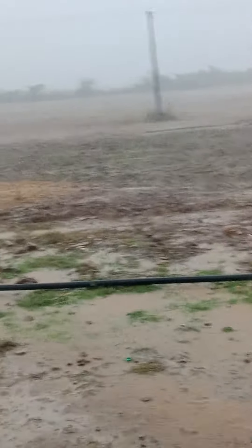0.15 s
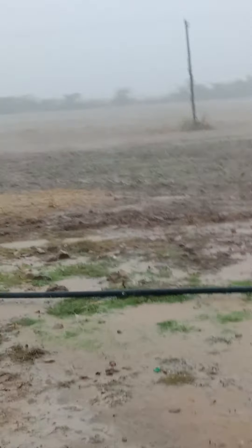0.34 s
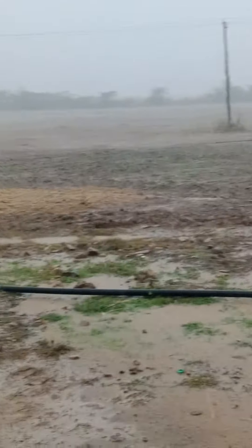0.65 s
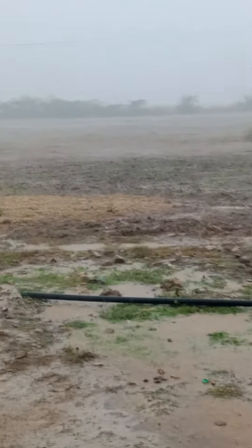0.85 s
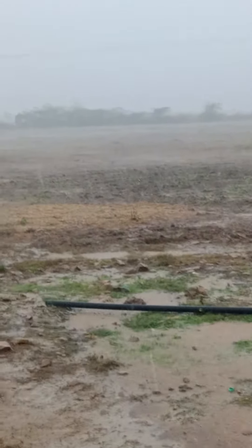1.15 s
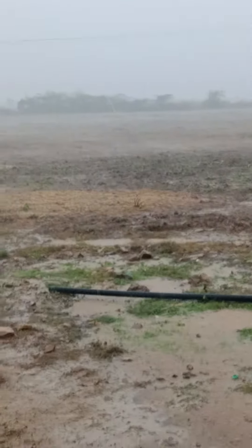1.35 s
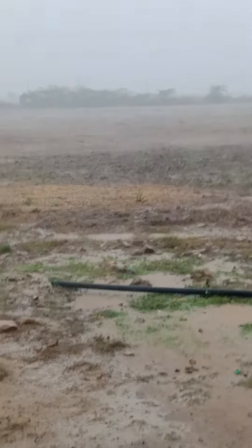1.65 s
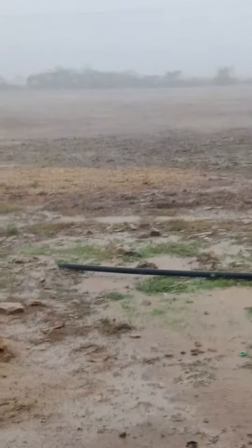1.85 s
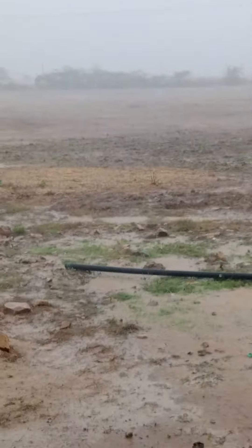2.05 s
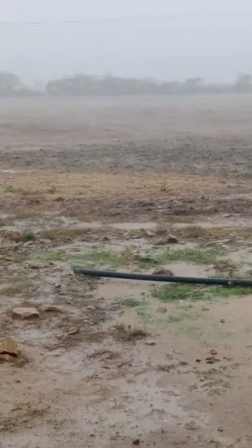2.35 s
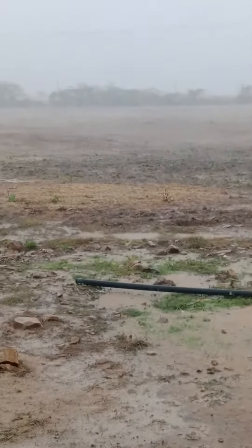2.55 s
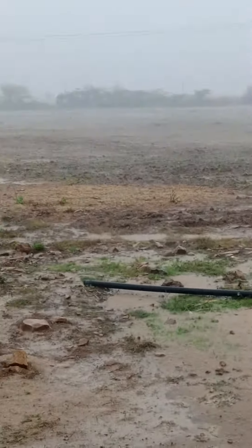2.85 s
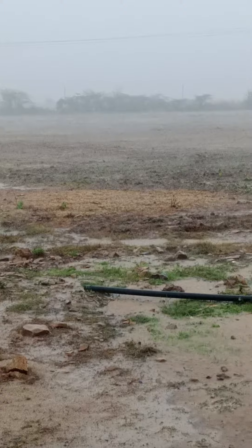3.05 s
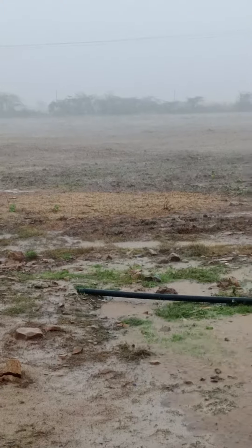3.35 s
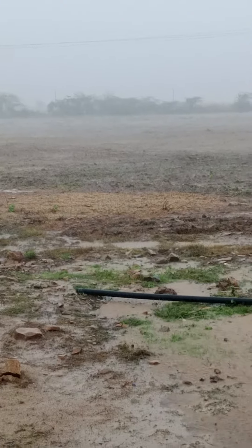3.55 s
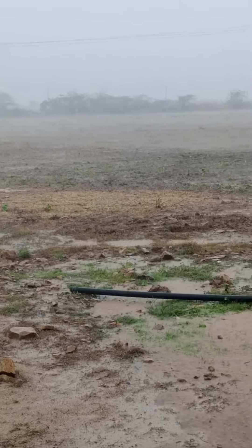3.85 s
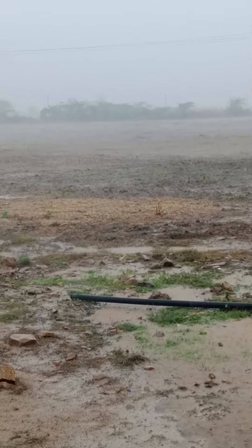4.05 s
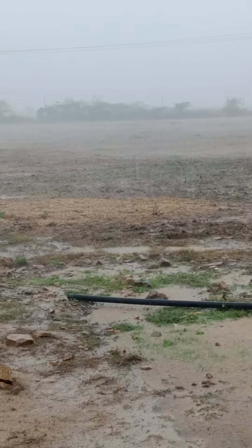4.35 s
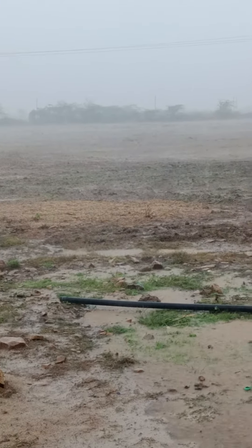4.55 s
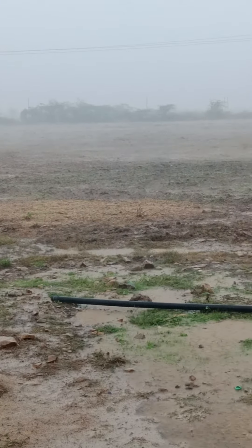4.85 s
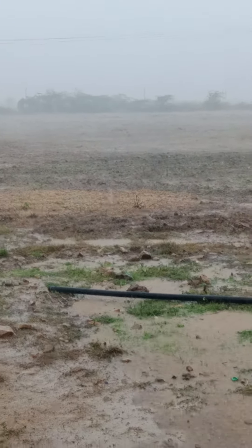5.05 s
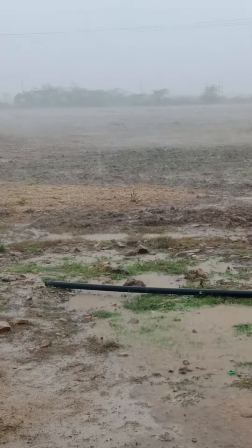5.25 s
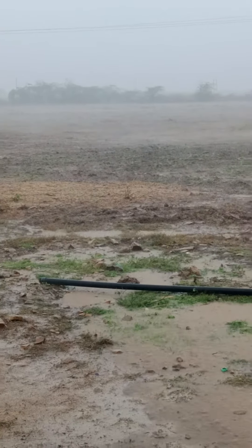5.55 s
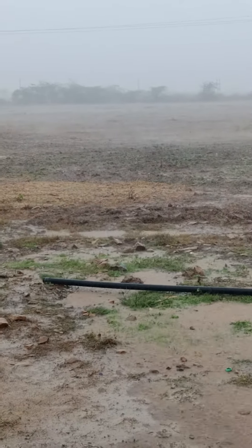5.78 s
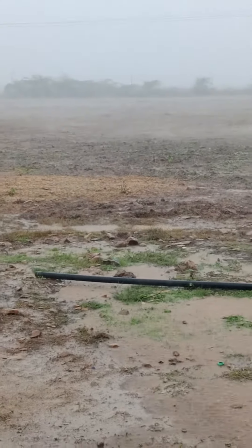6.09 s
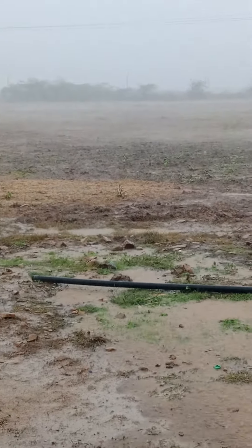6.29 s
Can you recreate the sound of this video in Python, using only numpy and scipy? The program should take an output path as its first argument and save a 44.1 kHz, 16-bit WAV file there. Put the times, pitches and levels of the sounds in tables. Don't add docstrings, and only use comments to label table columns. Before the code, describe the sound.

Heavy rain falls throughout on an open muddy field, heard close through a hand-held phone with no wind protection. The rain is a dense, bright, very high hiss, with a weaker, patchy lower patter underneath. Sharp tiny cracks and splashes of near drops dot it at random, plus occasional dull plastic ticks on the phone case. A violent low wind thump opens the first 0.1 seconds, and another rough, popping group hits around 0.6-0.8. From 1.3 to 2.5 softer rumbling bursts come and go, with a firmer one near 2.25, as the rain swells slightly. From about 2.8 to 5.1 the wind mostly drops, leaving hiss and drops, except a short low thud near 3.6; the rain thins around 4. Between 5.15 and 5.75 several fluttering gusts return while the rain strengthens again, then wind fades and rain continues to the end at about 6.4.

```python
import sys
import numpy as np
from scipy import signal
from scipy.fft import rfft, irfft, next_fast_len
from scipy.io import wavfile
from scipy.ndimage import uniform_filter1d, map_coordinates

SR = 44100
rng = np.random.default_rng(int(sys.argv[2]) if len(sys.argv) > 2 else 0)


def gain_from_decibels(decibels):
    exponent = np.asarray(decibels, float) / 20
    return 10 ** exponent


def wav_out(sig):
    wavfile.write(sys.argv[1], SR, np.round(np.clip(np.atleast_2d(sig).T, -1, 1) * 32767).astype(np.int16))


N = 283122

# time in seconds, level in dB.
DOWNPOUR = [(0.0, -43), (0.29, -41), (1.14, -42.5), (1.48, -39), (1.86, -40), (2.48, -36.5), (2.75, -38.5),
            (3.31, -39), (3.93, -42.5), (4.61, -40.5), (5.4, -37), (5.65, -36.5), (6.42, -40)]
# frequency in Hz, level in dB.
HISS_COLOUR = [(4000, -50), (4850, -42), (5700, -31), (6600, -5.5), (7700, -2), (8800, -4.5), (9400, -7.5),
               (10000, 0.5), (10900, -1), (11600, -3.5), (13000, 2), (14000, -8), (15000, 0.5),
               (16500, -12)]
# frequency in Hz, level in dB.
PATTER_COLOUR = [(30, -26), (90, -6.5), (200, -10), (600, -17), (850, -11), (1200, -3), (1700, -11),
                 (2100, -7.5), (2700, -4), (3100, -14.5), (3500, -28), (4400, -31.5), (4800, -64),
                 (5500, -92)]
# frequency in Hz, level in dB.
EDGE_COLOUR = [(4700, -69.5), (5000, -43.5), (5400, -25), (6300, -18.5), (6900, -24.5), (7600, -44)]
# start in seconds, peak level in dB, pitch in Hz.
NEAR_DROPS = [(0.19, -24, 9970), (0.3303, -28, 10300), (0.4, -18.5, 13000), (0.4798, -19, 10600),
              (0.5793, -26, 13100), (0.637, -23.5, 10000), (0.9112, -28, 11100), (1.0261, -22.5, 11000),
              (1.2864, -29, 9890), (1.9983, -18, 9970), (2.292, -24, 12900), (2.4647, -34, 9890),
              (2.5146, -28, 9980), (2.6138, -20, 10600), (2.6802, -20, 12800), (2.9034, -20, 12800),
              (3.1626, -24, 10700), (3.272, -22, 10300), (3.3585, -24, 10400), (3.5003, -25, 13000),
              (3.7647, -24, 7400), (3.897, -22.5, 7100), (4.15, -22, 10900), (4.2477, -28, 9920),
              (4.4443, -23.5, 12900), (4.9446, -22, 12500), (5.2449, -27, 12900), (5.5916, -16.5, 7550),
              (5.9174, -24, 12100), (6.3333, -18, 13000)]
# start in seconds, peak level in dB.
CASE_TAPS = [(0.0596, -30), (0.263, -33.5), (0.61, -37), (0.9842, -45), (1.569, -43), (2.2215, -37.5),
             (2.5137, -38), (3.11, -40), (3.355, -38), (5.76, -39), (5.8433, -33), (6.323, -47)]
# frequency in Hz, level in dB.
CASE_COLOUR = [(900, -42.5), (1800, -7), (2900, 0.0), (3400, -11.5), (4300, -22.5), (4800, -52)]
# start in seconds, hold in seconds, buffet level in dB, sharpness in dB.
GUSTS = [(.004, 0.016, -10, -7.5), (0.039, .022, -20.5, -11), (0.103, .044, -44.5, -43),
         (0.215, .014, -31.5, -13), (0.344, 0.0087, -38.5, -37), (0.599, 0.027, -16, -4.5),
         (0.661, 0.034, -21.5, -5), (0.711, 0.042, -22.5, -5.5), (1.317, 0.012, -34, -19),
         (1.368, 0.035, -29.5, -21), (1.438, 0.039, -32.5, -17.5), (1.603, 0.024, -31.5, -25),
         (1.744, .029, -34, -17), (1.839, .003, -34.5, -14), (1.934, 0.059, -31.5, -17),
         (2.024, 0.021, -27.5, -12.5), (2.085, .01, -35, -13), (2.248, 0.049, -25, -7),
         (2.336, 0.028, -28, -16.5), (2.426, 0.037, -31, -11.5), (2.769, 0.039, -39.5, -52),
         (3.588, .025, -27, -17), (5.16, 0.026, -25, -8.5), (5.281, 0.0073, -24.5, -14),
         (5.337, 0.099, -34, -10), (5.453, 0.057, -34.5, -11), (5.534, 0.067, -23, -7.5),
         (5.642, 0.085, -34.5, -24), (5.763, 0.087, -45.5, -30)]
# start in seconds, buffet level in dB, sharpness in dB.
PUFFS = [(.279, -41.5, -17), (.431, -56, -14), (.505, -53, -24), (.845, -41.5, -28), (.9, -52, -21),
         (1.226, -49, -16.5), (1.537, -47.5, -21), (1.681, -41.5, -18), (1.898, -38, -28),
         (2.155, -35.5, -33), (2.5, -32.5, -25), (2.56, -41.5, -32), (2.621, -35.5, -35), (2.702, -55, -21),
         (2.869, -53, -16), (2.939, -40.5, -23), (3.013, -50.5, -3), (3.074, -50.5, -2), (3.3, -37.5, -39),
         (3.748, -50.5, -21), (3.817, -51, -15), (3.89, -50, -19), (4.077, -43, -12), (4.171, -53, -15),
         (4.446, -47.5, -22), (4.842, -54, -7), (4.899, -36.5, -13), (6.218, -47.5, -26), (6.395, -62, -12)]
# end of the lull in seconds, change of level
# in dB.
LULLS = [
    (0.041, -17.5),
    (0.107, -11.5),
    (.569, -15),
    (0.656, -3.5),
    (0.809, -11.5),
    (1.599, -20.5),
    (2.226, -6),
    (3.576, -20),
    (5.146, -8),
    (5.915, -16),
]
# frequency in Hz, level in dB.
PORT_COLOUR = [(15, -53), (25, -12), (50, 6), (80, 8.5), (130, 5.5), (200, -1.5), (4000, -19.5),
               (6000, -54.5)]
# start in seconds, peak level in dB,
# level of the bright top in dB, time to fall 60 dB in seconds.
SLAPS = [(0.006, 2.5, -26.5, 0.025), (0.04, -26, -14, 0.034), (0.059, -36, -4, 0.047),
         (0.21, -37.5, -8, 0.069), (0.575, -20.5, -14, 0.05), (0.61, -6.5, -4, 0.034),
         (0.654, -17, -28, 0.032), (0.677, -11, -35, 0.044), (0.737, -8.5, -8.5, 0.014),
         (1.371, -36.5, -10, 0.016), (1.599, -59, -6, 0.025), (2.245, -41, 2, 0.083),
         (2.429, -27, -18, 0.033), (3.579, -44.5, -12, 0.025), (5.173, -31, -13, 0.04),
         (5.275, -41, -15, 0.03), (5.56, -27.5, -2.5, 0.15)]
# frequency in Hz, level in dB.
SLAP_BODY = [(30, -56), (80, -2.5), (200, 27.5), (500, 13), (900, -38), (1500, -55)]
SLAP_TOP = [(200, -43), (500, 15), (900, 21), (1400, 9.5), (2500, -12), (3500, -45)]
# frequency in Hz, level in dB.
MIC_BAND = [(15, -30), (40, -8), (70, 0), (15650, 0), (15760, -90)]

PATTER_DB, PATTER_FOLLOWS = -52, 0.66
TICK_SHARE = 0.23
STRAY_COUNT, STRAY_DB, STRAY_SPREAD_DB = 50, -26.5, 3
STRAY_LOW_HZ, STRAY_HIGH_HZ = 9800, 13000
PUFF_HOLD_S, RISE_DB_PER_S, FALL_DB_PER_S = .012, 633, 374
CALM_DB, CALM_SHARP_DB = -77, -12
DULLING = 0.34
KNEE_HZ = 190


def unit(x):
    return x / np.sqrt(np.mean(x ** 2) + 1e-20)


def along(points, hz):
    f, v = np.transpose(points)
    return np.interp(np.log(hz + 1), np.log(f + 1), v)


def curves(rows):
    s, *cols = np.transpose(rows)
    return [np.interp(np.arange(N) / SR, s, c) for c in cols]


def wobble(rate):
    return map_coordinates(rng.standard_normal(N // 200), [np.arange(N) * rate / SR])


def coloured(x, spectrum):
    m = next_fast_len(N + 8192)
    gain = gain_from_decibels(along(spectrum, np.fft.rfftfreq(m, 1 / SR)))
    return irfft(rfft(x, m) * gain, m)[..., :N]


def add_at(track, s, sound):
    track[round(s * SR):][:len(sound)] += sound


def patched(x, depth_db, bins, frames):
    z = signal.stft(x, nperseg=512)[2]
    knots = rng.standard_normal(z.shape)
    grid = np.meshgrid(np.arange(z.shape[0]) / bins, np.arange(z.shape[1]) / frames, indexing="ij")
    gain = gain_from_decibels(depth_db * map_coordinates(knots, grid, order=1))
    return signal.istft(z * gain, nperseg=512)[1][:N]


def suppressed(x, strength, floor_db):
    z = signal.stft(x, nperseg=1024, noverlap=768)[2]
    power = uniform_filter1d(abs(z) ** 2, size=8, axis=1)
    power = abs(uniform_filter1d(power, size=2, axis=0))
    gain = np.maximum(1 - strength * power.mean() / (power + 1e-20), gain_from_decibels(floor_db))
    return signal.istft(z * gain, nperseg=1024, noverlap=768)[1][:N]


def impacts(count, spread_db):
    draw = rng.random((count, 3))
    size = gain_from_decibels(-spread_db * np.log(draw[:, 1] + 0.0014)) * np.sign(draw[:, 2] - .5)
    return unit(np.bincount((draw[:, 0] * N).astype(int), size, N))


def rain():
    hiss_db, = curves(DOWNPOUR)
    patter_db = PATTER_DB + PATTER_FOLLOWS * (hiss_db - hiss_db.mean())
    far = np.sqrt(1 - TICK_SHARE) * rng.standard_normal(N)
    swarm = far + np.sqrt(TICK_SHARE) * impacts(count=9000, spread_db=3.5)

    thinned = suppressed(patched(swarm, depth_db=1.5, bins=2.443, frames=8), strength=0.46, floor_db=-11.5)
    hiss = coloured(patched(swarm, depth_db=0.55, bins=13.8, frames=3.3), HISS_COLOUR)
    hiss = unit(hiss + gain_from_decibels(3.7 * wobble(13)) * coloured(unit(thinned), EDGE_COLOUR))
    patter = unit(coloured(thinned, PATTER_COLOUR))

    hiss_db = hiss_db + .5 * wobble(8.2) + 0.54 * wobble(35)
    patter_db = patter_db + 0.39 * wobble(7.8)
    return gain_from_decibels(hiss_db) * hiss + gain_from_decibels(patter_db) * patter


def strays():
    draw = rng.random((STRAY_COUNT, 3))
    start = draw[:, 0] * N / SR
    peak_db = STRAY_DB + STRAY_SPREAD_DB * (2 * draw[:, 1] - 1)
    pitch = np.interp(draw[:, 2], [0, 1], [STRAY_LOW_HZ, STRAY_HIGH_HZ])
    return np.transpose([start, peak_db, pitch])


def drops():
    out, t = np.zeros(N + SR), np.arange(600) / SR
    for s, db, hz in [*NEAR_DROPS, *strays()]:
        crack = rng.standard_normal(len(t)) * gain_from_decibels(-60 * t / 0.0089)
        ring = 0.5 * np.sin(2 * np.pi * hz * t) * gain_from_decibels(-60 * t / 0.0033)
        splash_s = rng.uniform(0.0014, 0.0088)
        splash = 1.13 * rng.standard_normal(len(t)) * np.exp(-((t - splash_s) / 0.00058) ** 2)
        add_at(out, s, gain_from_decibels(db - 2.0) * (crack + ring + splash))
    return coloured(out[:N], HISS_COLOUR) + gain_from_decibels(-17) * coloured(out[:N], PATTER_COLOUR)


def taps():
    out, t = np.zeros(N + SR), np.arange(800) / SR
    for s, db in CASE_TAPS:
        add_at(out, s, rng.standard_normal(len(t)) * gain_from_decibels(db + 6.5 - 60 * t / 0.041))
    return coloured(out[:N], CASE_COLOUR)


def airflow():
    puffs = [(s, PUFF_HOLD_S, db, sharp) for s, db, sharp in PUFFS]
    s, hold, db, sharp_db = np.transpose(GUSTS + puffs)[..., None]
    t = np.arange(0, N / SR, .001)
    rising_db = RISE_DB_PER_S * np.clip(s - t, 0, None)
    falling_db = FALL_DB_PER_S * np.clip(t - s - hold, 0, None)
    under_db = rising_db + falling_db
    power, calm = gain_from_decibels(2 * (db - under_db)), gain_from_decibels(2 * CALM_DB)
    total = power.sum(0) + calm
    sharpness = (power * (sharp_db - DULLING * under_db)).sum(0)
    reach_db = (sharpness + calm * CALM_SHARP_DB) / total
    return curves(np.transpose([t, 10 * np.log10(total), reach_db]))


def buffet():
    level_db, reach_db = uniform_filter1d(airflow(), size=350)
    for s, lull_db in LULLS:
        around = [s - .045, s - .025, s - .003, s + 0.0034]
        level_db = level_db + np.interp(np.arange(N) / SR, around, [0, lull_db, lull_db, 0])

    spectrum = rfft(coloured(rng.standard_normal(N), PORT_COLOUR))
    octave = np.log2(np.fft.rfftfreq(N, 1 / SR) + 1)
    crackle = np.minimum(wobble(85), 1)
    out = np.zeros(N)
    for centre in np.arange(4, 12, .5):
        band = irfft(spectrum * np.clip(1 - 2 * abs(octave - centre), 0, 1), N)
        fall_db = np.minimum(reach_db + 1.0, -1.5) * (max(2 ** centre - KNEE_HZ, 0) / 210) ** 1.04
        gate_db = np.clip(1.2 * (level_db + fall_db + 44.5), 3 * fall_db, 0)
        lean_db = -.14 * np.clip(level_db + 74.5, 0, 40) * max(7.4 - centre, 0)
        clump_db = 1.2 * max(centre - 8, 0) * crackle
        out += band * gain_from_decibels(fall_db + gate_db + lean_db + 3.7 * wobble(40) + clump_db)

    steady = out / np.sqrt(abs(uniform_filter1d(out ** 2, size=1100)) + 1e-9)
    return gain_from_decibels(level_db + 2.5 * wobble(30)) * steady


def pops():
    body, top, t = np.zeros(N + SR), np.zeros(N + SR), np.arange(SR // 8) / SR
    for s, db, top_db, t60 in SLAPS:
        onset = 1 - np.exp(-t / .004)
        burst = rng.standard_normal(len(t)) * gain_from_decibels(db - 60 * t / t60) * onset
        add_at(body, s, burst)
        add_at(top, s, burst * gain_from_decibels(top_db))
    return coloured(body[:N], SLAP_BODY) + coloured(top[:N], SLAP_TOP)


def scene():
    return (rain() + drops() + taps() + buffet() + pops())[None]


def low_pass(x):
    return signal.sosfilt(signal.butter(12, 15720, fs=SR, output="sos"), x)


def record(dry):
    opening = np.clip(np.arange(N) / (.004 * SR), 0, 1)
    return low_pass(opening * coloured(dry, MIC_BAND))


dry = scene()
out = record(dry)
wav_out(out)
```